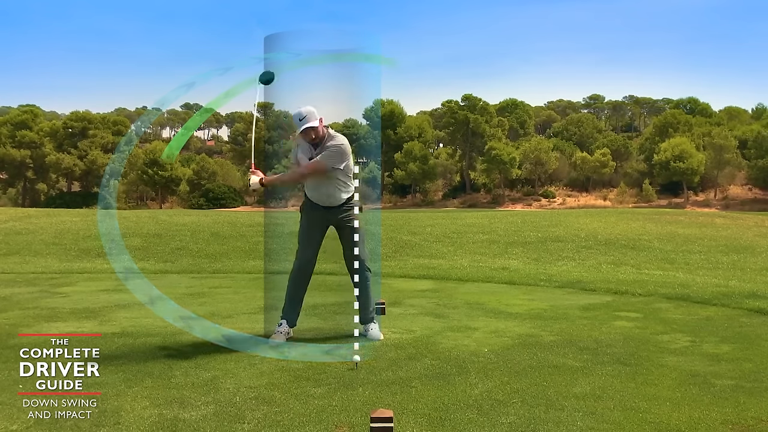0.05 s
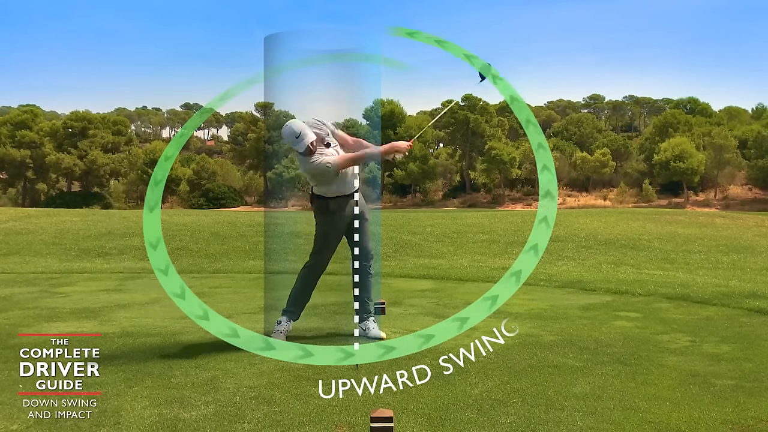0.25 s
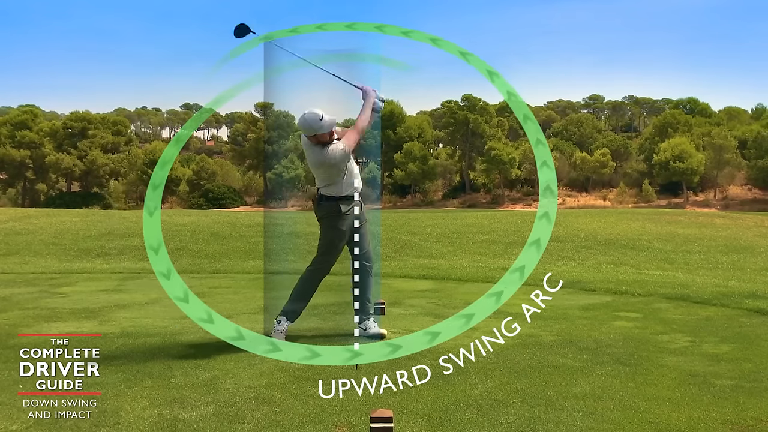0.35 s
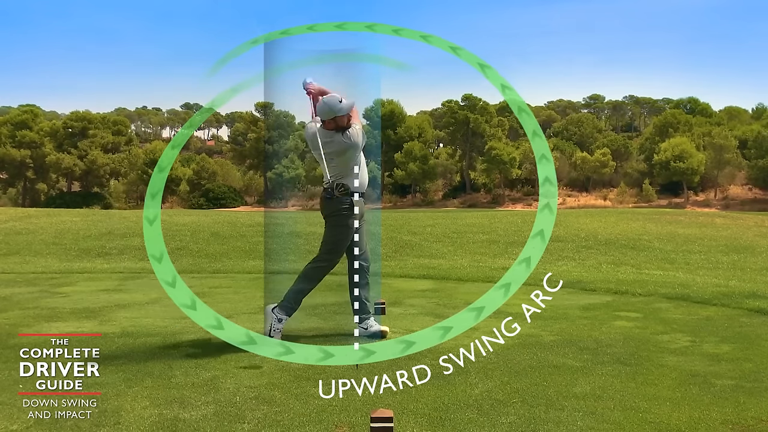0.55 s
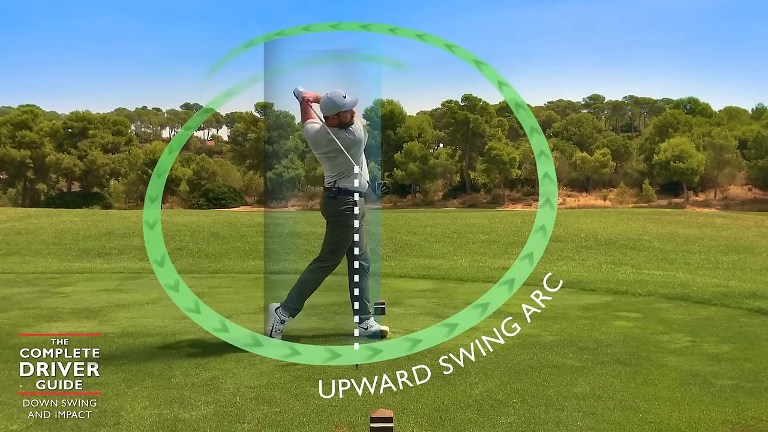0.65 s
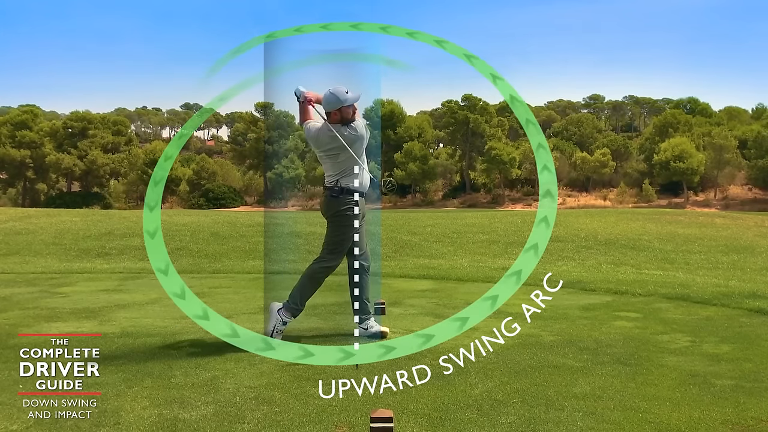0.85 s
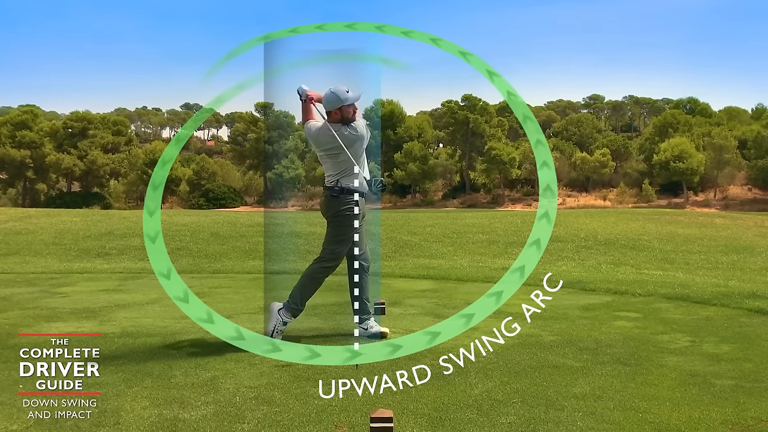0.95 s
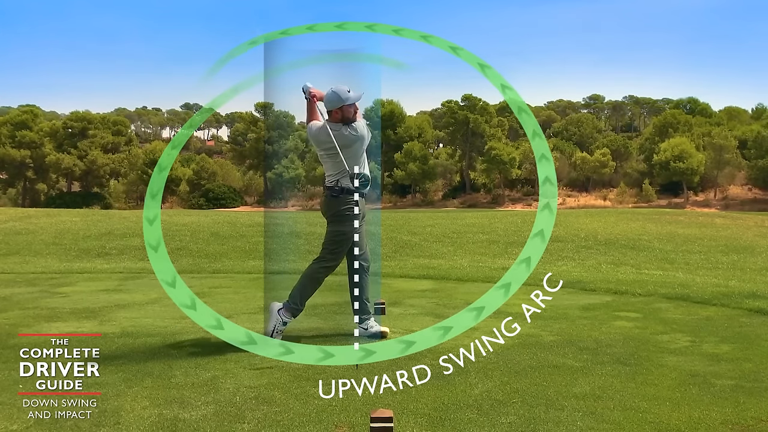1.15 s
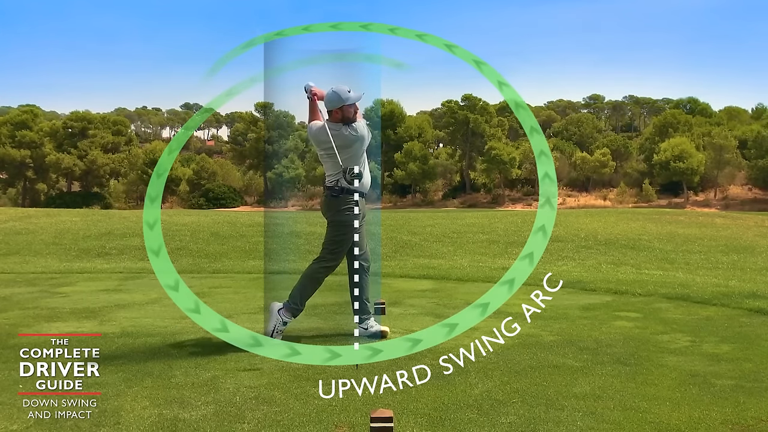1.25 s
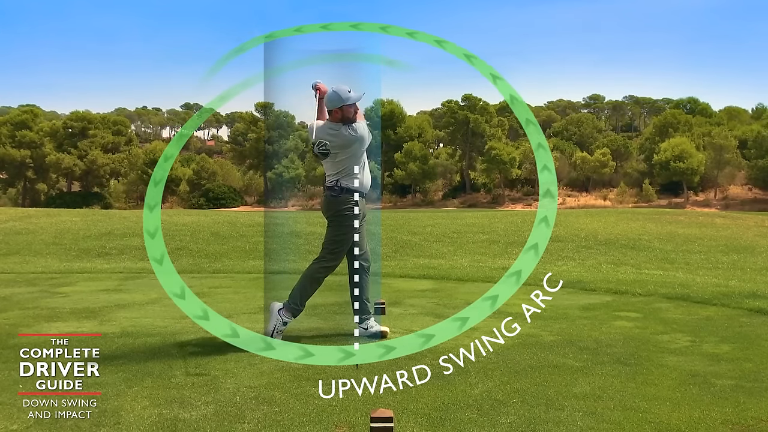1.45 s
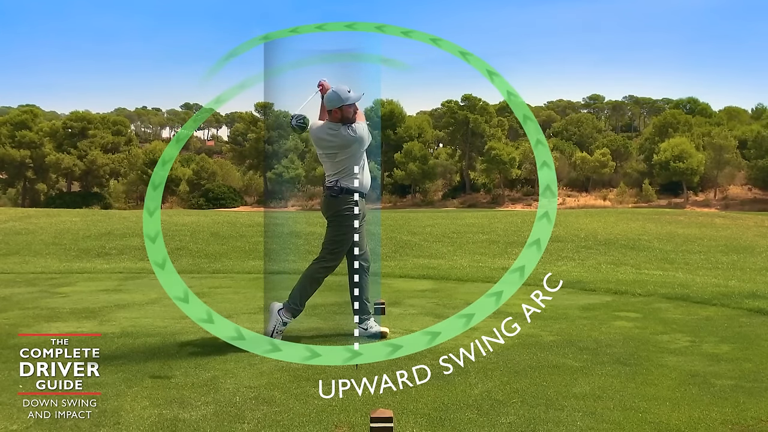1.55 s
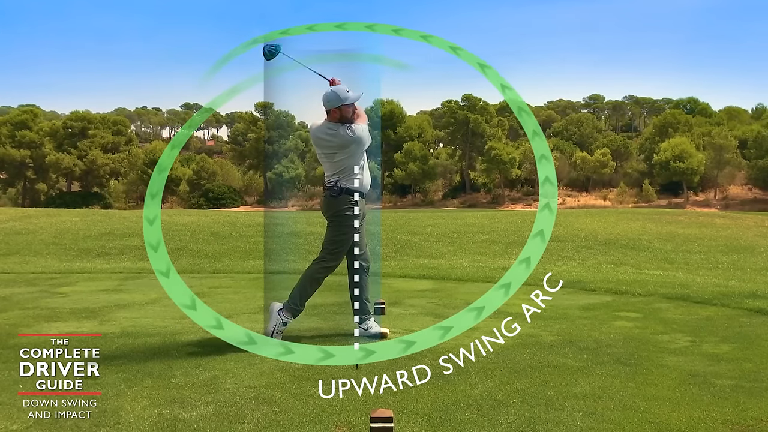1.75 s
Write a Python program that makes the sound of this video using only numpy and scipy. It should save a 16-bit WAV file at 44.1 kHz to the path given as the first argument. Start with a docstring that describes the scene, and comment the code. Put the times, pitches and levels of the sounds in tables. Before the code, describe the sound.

Close to the microphone on an open course, a short scuff and rising swish lead to a loud, bright metal smack on a golf ball, followed by a small sharp click, soft cloth rustle and quiet air.

```python
"""Light breeze, rumbling air and rustling clothes on an open course; then a scuff and a rising shaft whistle.
Close to the microphone a driver smacks a golf ball off a tee, and its hollow metal head rings briefly.
A sharp tick follows; low thuds, lighter ticks and faint, far insects lie around the stroke.
Air and cloth are coloured noise, the whistle is narrow noise that follows a pitch, and the hit
is a set of decaying sines with a crack of noise."""
import sys
import numpy as np
from scipy import signal
from scipy.fft import rfft, irfft
from scipy.io import wavfile

SR = 44100
rng = np.random.default_rng(int(sys.argv[2]) if len(sys.argv) > 2 else 0)


def int16_out(signal):
    """Quantize to a 16-bit WAV file."""
    q = np.round(np.clip(np.atleast_2d(signal).T, -1, 1) * 32767)
    wavfile.write(sys.argv[1], SR, q.astype(np.int16))


N = 79380  # length in samples

HIT_S, RING_S = .2008, .2028  # first contact; the head starts to ring

# Spectrum of the crack of the hit. Each row: frequency in Hz, level in dB.
CRACK_COLOUR = [(300, -23.5), (1000, -26.5), (2000, -19.5), (2700, -13), (3600, -11.5), (4400, 1.5),
                (6500, 3), (8000, -8), (9600, -2.5), (11000, -11.5), (14500, -13.5), (16000, -21.5)]


def amp(db):
    """Turn a level in dB into an amplitude."""
    return 10 ** (np.asarray(db) / 20)


def evened(x):
    """Bring a signal to an RMS of one."""
    return x / np.sqrt(np.mean(x ** 2) + 1e-20)


def since(s):
    """Seconds since a moment, zero before it."""
    return np.maximum(np.arange(N) / SR - s, 0)


def curve(rows, axis=1):
    """One column of a table, joined by straight lines in time."""
    rows = np.array(rows)
    return np.interp(np.arange(N) / SR, rows[:, 0], rows[:, axis])


def noise(points):
    """Noise of unit RMS with the given spectrum, joined by lines over log frequency."""
    hz, db = np.transpose(points)
    f = np.fft.rfftfreq(N, 1 / SR)
    gain = amp(np.interp(np.log(f + 1), np.log(hz), db))
    white = rng.standard_normal(N)
    return evened(irfft(rfft(white) * gain, N))


def band(hz, width_hz):
    """A narrow band of noise that follows a pitch: slow complex noise turned at that pitch."""
    r = np.exp(-np.pi * width_hz / SR)
    white = rng.standard_normal(N) + 1j * rng.standard_normal(N)
    slow = signal.lfilter([1], np.poly([r, r]), white)
    carrier = np.exp(2j * np.pi * np.cumsum(hz * np.ones(N)) / SR)
    return evened((slow * carrier).real)


def rise(t, rise_s):
    """A smooth onset from zero to one."""
    return 1 - np.exp(-(t / rise_s) ** 2)


def fade(t, t60):
    """An exponential decay that has lost 60 dB after t60 seconds."""
    return np.exp(-np.log(1000) * t / t60)


def ring(t, modes):
    """A sum of decaying sines; each mode is a frequency in Hz, level in dB and t60 in seconds."""
    return sum(amp(db) * fade(t, t60) * np.sin(2 * np.pi * hz * t) for hz, db, t60 in modes)


def outdoors():
    """A steady breeze, a rumble of air that is strongest around the swing, and faint, far insects."""
    # Spectra of the breeze and of the low rumble. Each row: frequency in Hz, level in dB.
    breeze_colour = [(20, -20), (45, -4.5), (100, -2.5), (150, -11.5), (200, -20), (350, -32.5), (550, -33),
                     (830, -26.5), (1400, -30), (2400, -32), (3600, -39), (6000, -37), (10000, -38),
                     (16000, -40)]
    rumble_colour = [(20, -14), (50, -4.5), (100, 0), (170, -5), (300, -15.5), (1000, -50)]
    breeze_db, rumble_db, insects_db = -62, -51.5, -82.5
    rumble_peak_s, rumble_fade_db_per_s = .25, 27
    rumble_level_db = rumble_db - rumble_fade_db_per_s * abs(since(0) - rumble_peak_s)
    breeze = amp(breeze_db) * noise(breeze_colour)
    rumble = amp(rumble_level_db) * noise(rumble_colour)
    insects = amp(insects_db) * band(hz=4320, width_hz=600)
    return breeze + rumble + insects


def course():
    """Grass and trees scatter a faint tail of the crack."""
    # Spectrum of the scattered tail. Each row: frequency in Hz, level in dB.
    tail_colour = [(200, 2), (700, 2), (1500, -5.5), (3000, -7), (6000, -3), (10000, -3), (15500, -13.5)]
    tail_db, tail_t60 = -44.5, .42  # t60 in s
    t = since(RING_S)
    return amp(tail_db) * rise(t, .01) * fade(t, tail_t60) * noise(tail_colour)


def movement():
    """A short scuff in the downswing, and clothes rustling as the body turns."""
    # Loudness of the high rustle, then of the soft, dull swishing. Each row: time in seconds, level in dB.
    rustle_level = [(0, -71), (.025, -55), (.045, -61.5), (.11, -62.5), (.15, -58.5), (.29, -56),
                    (.35, -62), (.41, -56.5), (.45, -55.5), (.51, -64), (.62, -72.5), (.68, -68.5),
                    (.74, -77), (.9, -84), (1.35, -80.5), (1.52, -69), (1.66, -79), (1.8, -76)]
    swish_level = [(0, -64.5), (.3, -61), (.36, -65), (.43, -57), (.49, -72), (.54, -63.5), (.62, -69.5),
                   (.68, -62.5), (.79, -65), (.83, -77), (1.33, -75), (1.48, -69), (1.515, -63.5),
                   (1.57, -70.5), (1.605, -64.5), (1.69, -74), (1.8, -73)]
    # Spectra of scuff, rustle and swishing. Each row: frequency in Hz, level in dB.
    scuff_colour = [(100, 23), (300, 13), (900, 1), (2500, -3.5), (6000, -8), (15000, -10)]
    rustle_colour = [(200, -1.5), (1500, -2.5), (4500, 0.5), (9000, -4), (15500, -11)]
    swish_colour = [(100, -0.5), (300, 2.5), (800, -1.5), (1800, -7), (2800, -11.5), (4000, -20),
                    (15000, -26)]
    scuff_s, scuff_rise_s, scuff_hold_s, scuff_t60, scuff_db = .053, .002, .0081, .087, -34.5

    scuff_shape = rise(since(scuff_s), scuff_rise_s) * fade(since(scuff_s + scuff_hold_s), scuff_t60)
    scuff = amp(scuff_db) * scuff_shape * noise(scuff_colour)
    rustle = amp(curve(rustle_level)) * noise(rustle_colour)
    swish = amp(curve(swish_level)) * noise(swish_colour)
    return scuff + rustle + swish


def thud(s, hz, db, decay_s):
    """A dull bump: a low sine that dies away quickly."""
    t = since(s)
    rise_s = .0013
    return -amp(db) * rise(t, rise_s) * np.exp(-t / decay_s) * np.sin(2 * np.pi * hz * t)


def tick(s, db, t60, tilt_db):
    """A dry click with no ring: a burst of noise, tilted towards the treble by tilt_db per octave."""
    # Spectrum of a click before its tilt. Each row: frequency in Hz, level in dB.
    tick_colour = [(200, -5.5), (900, -30.5), (1450, 11.5), (2200, 11.5), (3300, -6), (4400, -2), (5800, 5),
                   (10000, 0), (13000, -5), (16000, -24)]
    t = since(s)
    tilted = [(hz, level + tilt_db * np.log2(hz)) for hz, level in tick_colour]
    return amp(db) * (t > 0) * fade(t, t60) * noise(tilted)


def thuds_and_ticks():
    """Low thuds and sharp ticks around the stroke; the lightest ticks are the thinnest."""
    # Low thuds. Each row: start in seconds, pitch in Hz, level in dB, decay in seconds.
    thud_rows = [(0.0675, 80.5, -25.5, .013), (.204, 90, -20, .007), (0.275, 62, -31, 0.02),
                 (0.338, 102.6, -38.5, 0.018), (0.412, 98.3, -34, 0.0075), (1.395, 85, -64, 0.016)]
    # Sharp ticks. Each row: start in seconds, level in dB, t60 in seconds, treble tilt in dB per octave.
    tick_rows = [(.0555, -35.5, 0.0069, 0), (0.0687, -45, .005, 7), (.415, -24.5, 0.0075, 1),
                 (.672, -49, 0.0066, 6), (.679, -52, 0.0058, 6)]
    return sum(thud(*row) for row in thud_rows) + sum(tick(*row) for row in tick_rows)


def swing():
    """Eddies shed by the club whistle with its speed; the slower upper shaft sounds lower."""
    # Path of the swing. Each row: time in seconds, whistle pitch in Hz, level in dB.
    swing_path = [(.09, 500, -68), (.145, 803.6, -64), (.165, 875.3, -44), (.18, 888, -37.5),
                  (.2, 996.3, -36), (.218, 715, -38.5), (.25, 604, -51.5), (.288, 495, -50),
                  (.312, 419, -81.5)]
    # Spectrum of the broad rush of air. Each row: frequency in Hz, level in dB.
    air_colour = [(150, -4.5), (1000, -0.5), (2000, -3.5), (3000, -5), (6500, -5), (10000, -6.5),
                  (15500, -17)]
    shaft_ratio = .58  # pitch of the upper shaft against the whistle
    shaft_db, air_db = .5, -8.5  # against the whistle

    hz = curve(swing_path, axis=1)
    whistle = band(hz, width_hz=130)
    shaft = amp(shaft_db) * band(hz * shaft_ratio, width_hz=520)
    air = amp(air_db) * noise(air_colour)
    return amp(curve(swing_path, axis=2)) * (whistle + shaft + air)


def smack():
    """The contact: a hard knock with a bite of treble; as the ball leaves, a push that drops into the bass."""
    # Short knocks of ball and face. Each row: frequency in Hz, level in dB, t60 in seconds.
    knock_modes = [(1270, -12.5, 0.019), (2173, 1, .006)]
    knock_rise_s, bite_db, bite_t60 = .00042, -19.5, .06
    # the push falls by drop_hz towards end_hz
    drop_hz, end_hz, fall_s = 1050, 45.39, .0027
    push_db, push_rise_s, push_decay_s = -7.5, .00062, .0026

    t, after = since(HIT_S), since(RING_S)
    knock = ring(t, knock_modes)
    bite = amp(bite_db) * fade(t, bite_t60) * noise(CRACK_COLOUR)
    push_hz = end_hz + drop_hz * np.exp(-after / fall_s)
    turns = np.cumsum(push_hz * (after > 0)) / SR
    push_shape = rise(after, push_rise_s) * np.exp(-after / push_decay_s)
    push = amp(push_db) * push_shape * np.sin(2 * np.pi * turns)
    return rise(t, knock_rise_s) * (knock + bite) + push


def head():
    """The hollow head rings in its modes over a dense crack; one thin, slowly rising note lingers."""
    # Modes of the club head. Each row: frequency in Hz, level in dB against the ring, t60 in seconds.
    head_modes = [(670, -25, .05), (2848, -2, .027), (3170, -17, .04), (4385, 0, .028), (4495, -1, .031),
                  (5005, -18, .07), (5185, -16, .06), (5348, -11, .08), (5410, -13, .07), (5540, -16, .078),
                  (5963, -13, .045), (6171, -14, .052), (6328, -8, .038), (6736, -15, .04),
                  (7560, -16, .04), (8507, -12, .033), (9230, -7, .026), (9455, -6, .028),
                  (9720, -15, .035), (12520, -18, .033)]
    ring_rise_s, ring_db = .0034, 3
    crack_db, crack_rise_s, crack_t60 = -4.5, .0012, .04
    sing_hz, sing_rise_hz_per_s, sing_db, sing_t60 = 2104, 240, -42, .33

    t = since(RING_S)
    modes = amp(ring_db) * ring(t, head_modes)
    crack = amp(crack_db) * rise(t, crack_rise_s) * fade(t, crack_t60) * noise(CRACK_COLOUR)
    sing_turns = (sing_hz + sing_rise_hz_per_s * t / 2) * t
    sing = amp(sing_db) * fade(t, sing_t60) * np.sin(2 * np.pi * sing_turns)
    return rise(t, ring_rise_s) * (modes + sing) + crack


def scene():
    """The stroke and everything around it, in mono."""
    around = outdoors() + course() + movement() + thuds_and_ticks()
    stroke = swing() + smack() + head()
    return (around + stroke)[None]


def record(dry):
    """The loudest peaks are rounded off at full scale; then a low-pass limits the band."""
    edge_hz = 16150
    held = dry / (1 + dry ** 6) ** (1 / 6)
    low_pass = signal.firwin(255, edge_hz, window=("kaiser", 8), fs=SR)
    return signal.oaconvolve(held, low_pass[None], "same")


dry = scene()
out = record(dry)
int16_out(out)
```